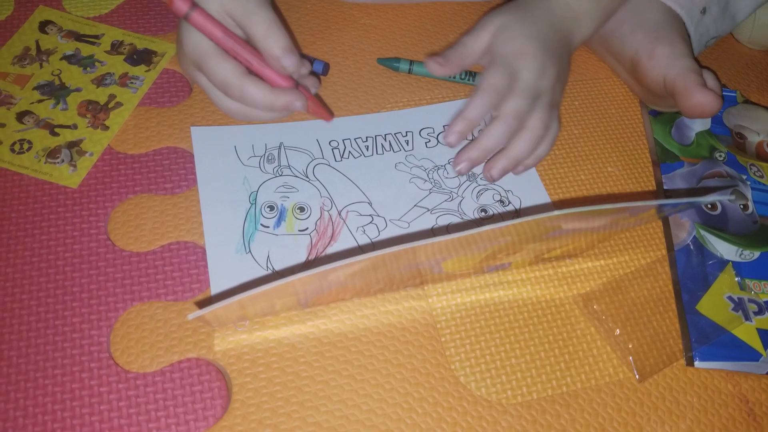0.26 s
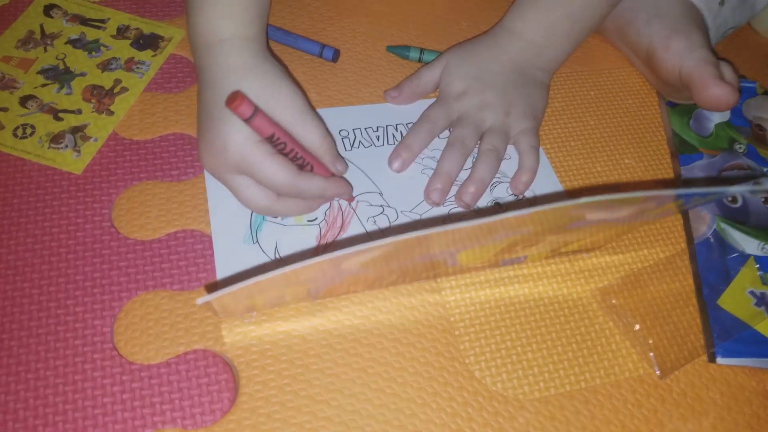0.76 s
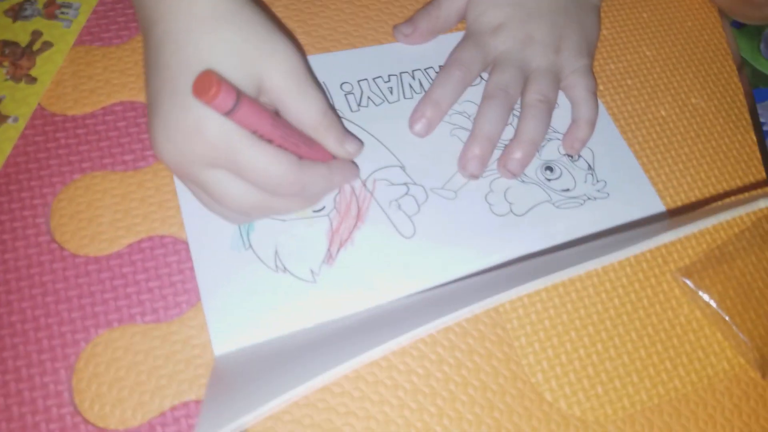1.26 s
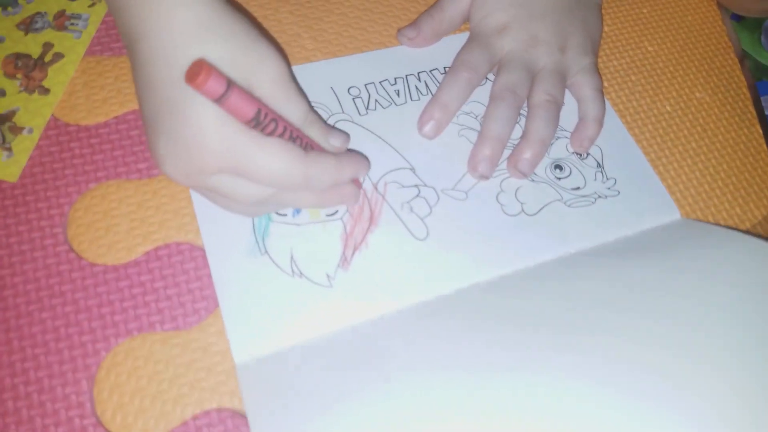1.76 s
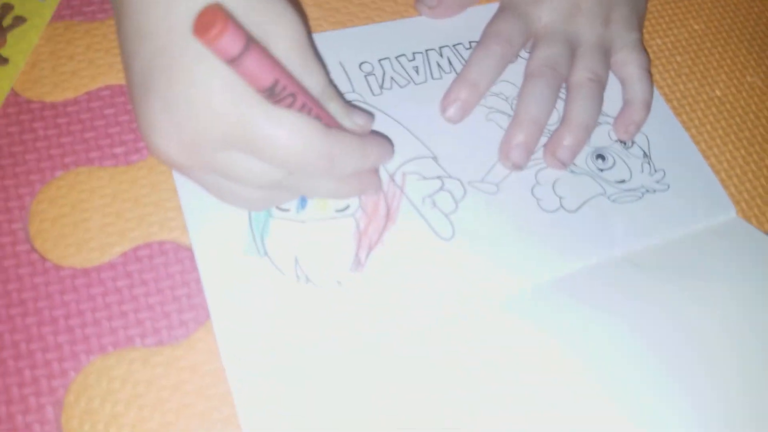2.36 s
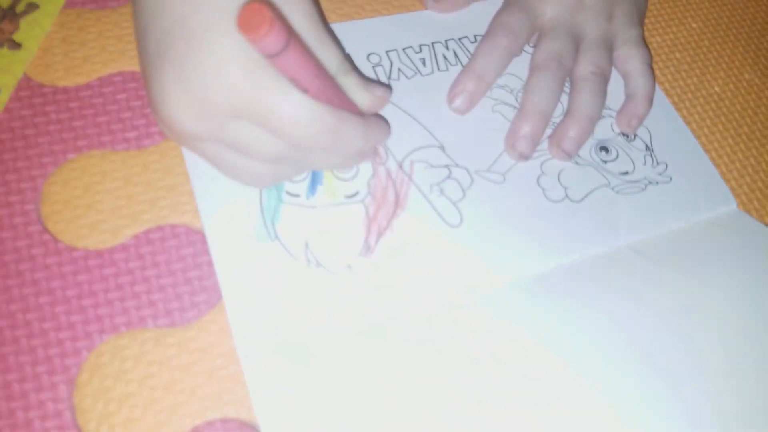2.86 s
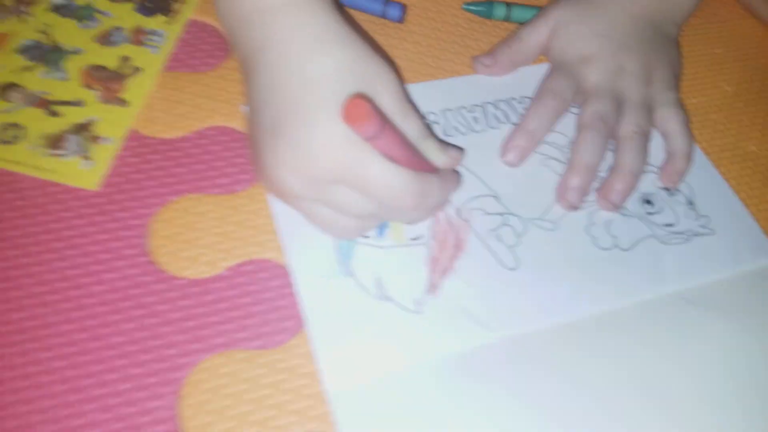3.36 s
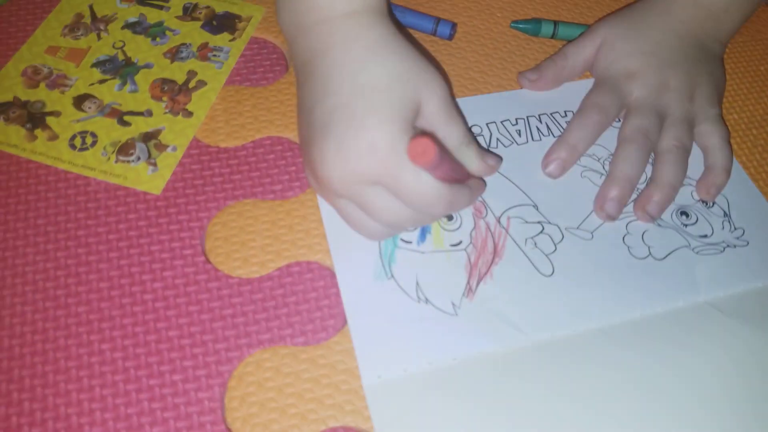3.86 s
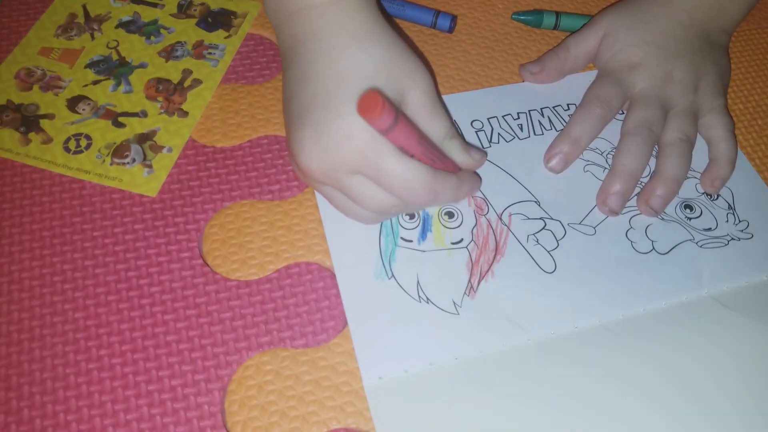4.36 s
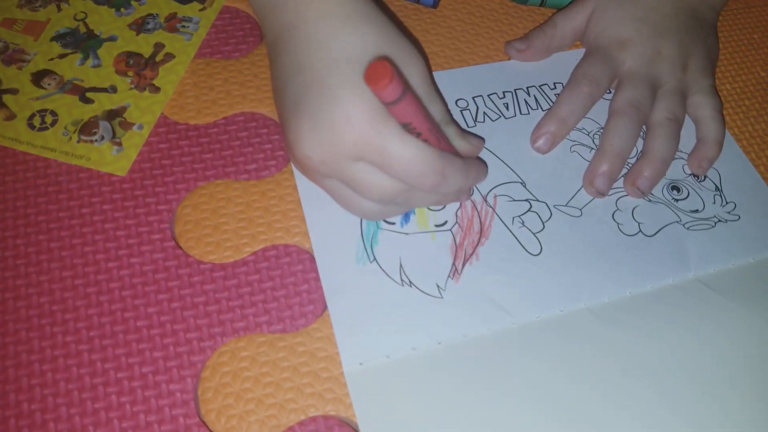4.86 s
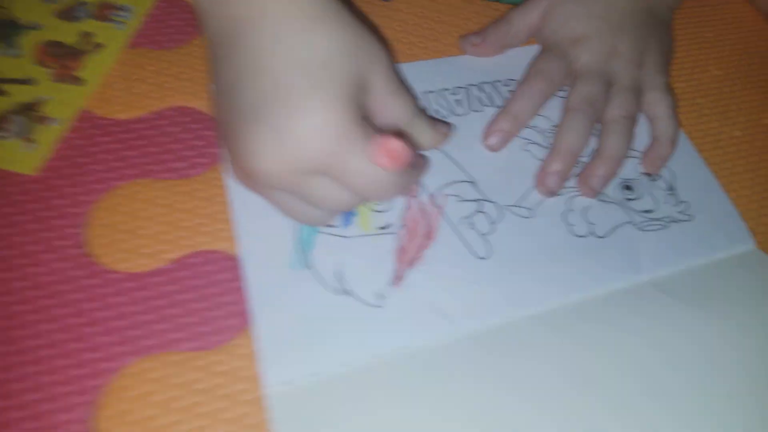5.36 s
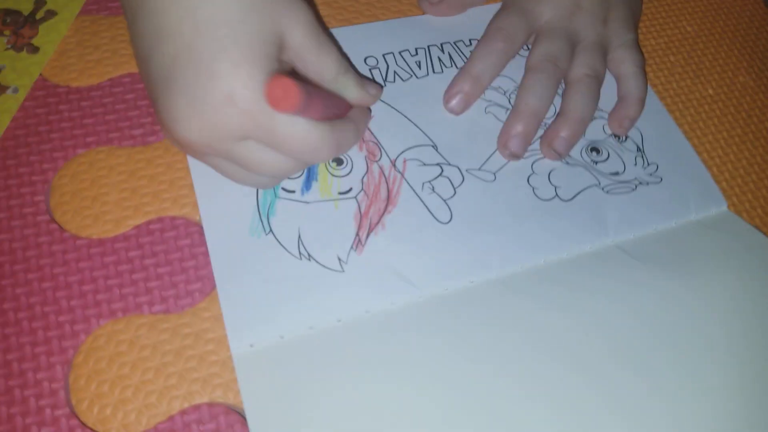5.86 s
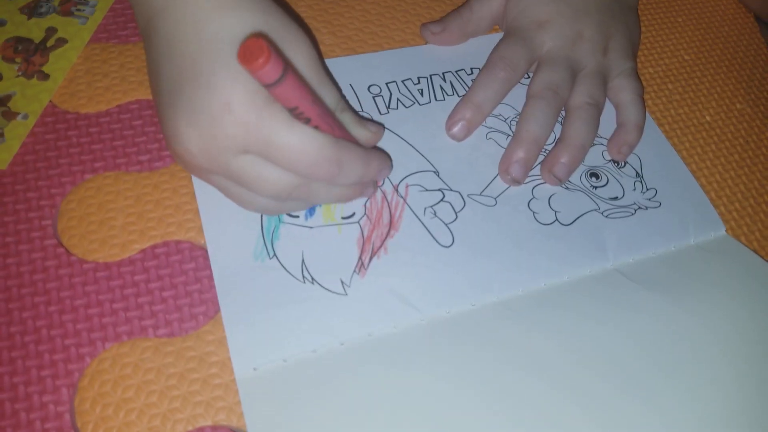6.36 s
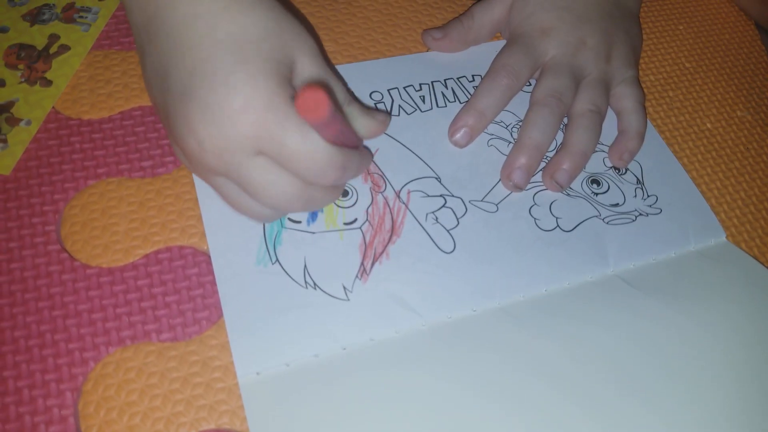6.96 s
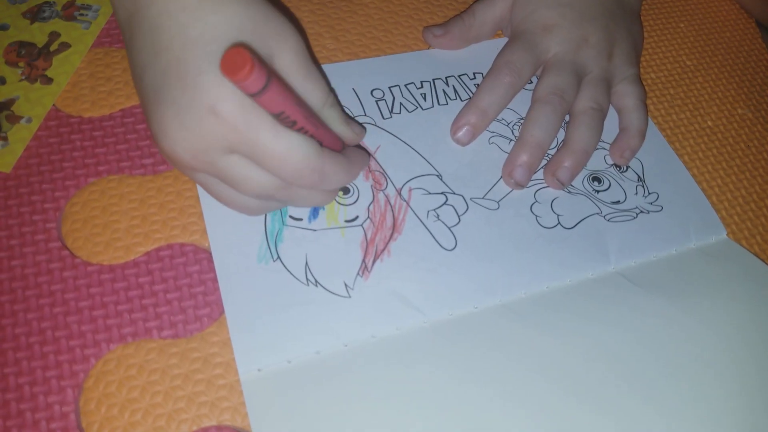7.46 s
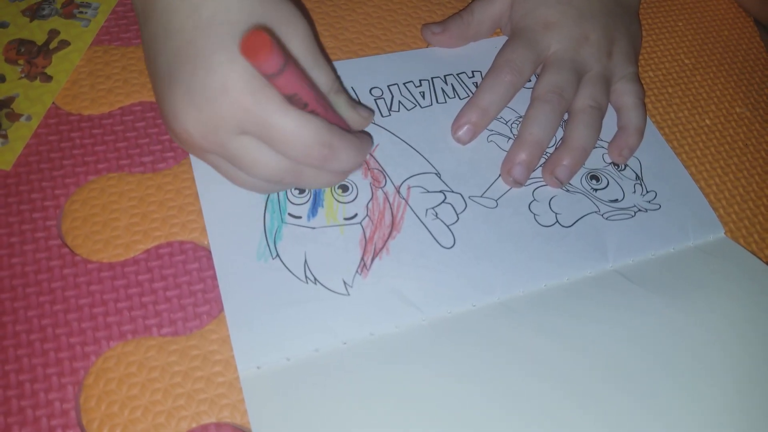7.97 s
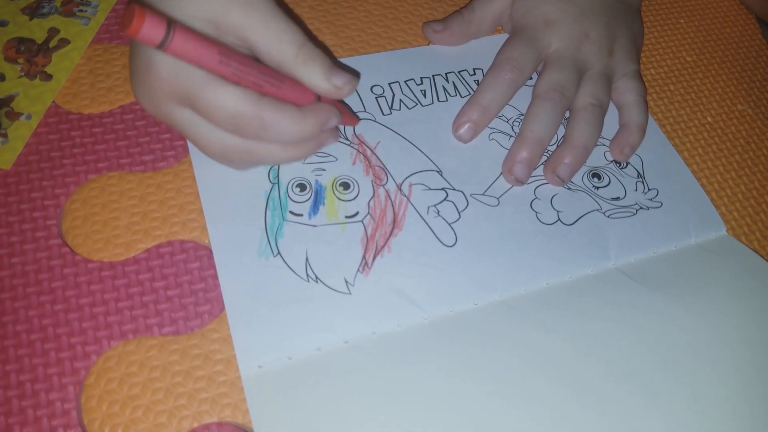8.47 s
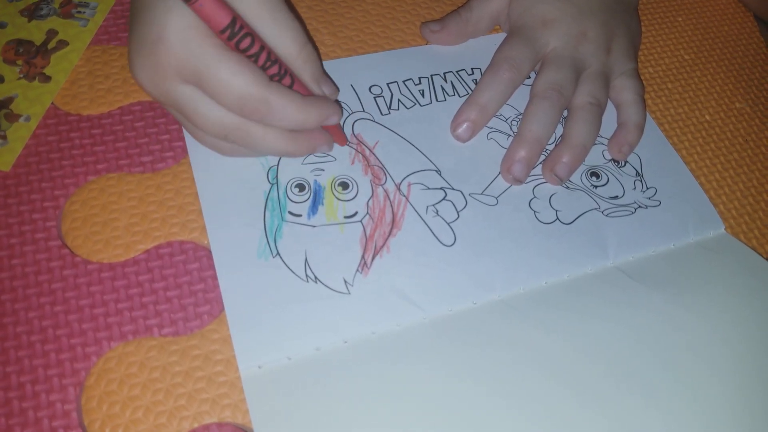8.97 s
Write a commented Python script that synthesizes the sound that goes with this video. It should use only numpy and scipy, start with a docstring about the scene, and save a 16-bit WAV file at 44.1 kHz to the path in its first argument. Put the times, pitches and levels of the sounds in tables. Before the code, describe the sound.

Close, sharp clicks, thuds and skin rubs come from fingers shifting on the microphone, mainly on the right, along with soft slides of paper and a couple of crayon strokes. As the handling settles, a wax crayon scribbles quietly on a colouring book in short scratches. The fingers bump once more midway, and the last strokes grow longer and gentler. A fan's low drone and faint airy hiss fill the quiet room throughout.

```python
"""A fan motor hums in a quiet room, where a child colours a book with a wax crayon on a foam mat.
First come two lone strokes, wax catching on paper, while the page slides as the book is opened flat.
Fingers rub and tap the phone held above it, beside the right microphone, far louder than the crayon
and loudest near 2.5 s. From 3.5 s the crayon scratches in short strokes. Between 5 and 6 s the fingers
shift again and the page slides once more; the last strokes are longer and softer."""
import sys
import numpy as np
from scipy import signal
from scipy.fft import rfft, irfft
from scipy.io import wavfile
from scipy.ndimage import uniform_filter1d

SR = 44100
rng = np.random.default_rng(int(sys.argv[2]) if len(sys.argv) > 2 else 0)


def wrap_up_sound(samples):
    """Save the sound to the file named by the first command line argument, as 16-bit audio."""
    columns = np.atleast_2d(samples).T
    # keep every value between -1 and 1, then stretch to whole-number steps
    tamed = np.clip(columns, -1, 1)
    steps = np.round(tamed * 32767).astype(np.int16)
    wavfile.write(sys.argv[1], SR, steps)


N = 407032
TIME = np.arange(N) / SR
FREQ = np.maximum(np.fft.rfftfreq(N, 1 / SR), 1)

# crayon strokes: (start [s], end [s], pressure [dB])
STROKES = [(0.398, 0.504, 0.5), (1.262, 1.438, -7), (3.457, 3.696, -9.5), (3.682, 3.844, -2),
           (3.898, 4.028, -5), (4.107, 4.204, -2), (4.342, 4.547, 1), (4.662, 4.874, 2.5),
           (5.031, 5.172, -2), (5.224, 5.322, 0), (5.398, 5.51, -3), (5.76, 5.835, 0.5), (5.804, 5.934, -2),
           (6.059, 6.15, -1.5), (6.637, 6.793, -2.5), (6.985, 7.094, -2.5), (7.108, 7.183, -11),
           (7.598, 7.749, -2.5), (7.883, 7.946, -4.5), (7.932, 8.094, -6.5), (8.33, 8.648, -6.5),
           (8.614, 8.793, -10.5), (8.948, 9.3, -10.5)]
# tone of wax dragging over paper: (frequency [Hz], left [dB], right [dB])
WAX_TONE = [(1160, -108, -101), (1850, -102, -87.5), (2500, -107, -108), (3320, -104, -91),
            (3630, -108, -99), (4900, -106, -91.5), (5930, -120, -96), (7300, -120, -91.5),
            (8130, -118, -102.5), (9150, -118, -98.5), (10500, -121, -100.5), (12400, -119, -116),
            (14400, -116, -116), (15500, -113, -108)]
# slides of the page: (fastest moment [s], rise [s], fall [s], relative level [dB])
PAGE_SLIDES = [(.433, 0.011, 0.031, -2.5), (.815, 0.038, .06, -9), (1.03, 0.071, 0.096, -5),
               (1.615, 0.065, 0.024, -7.5), (2.08, 0.082, 0.063, 1), (2.45, 0.16, .035, -10.5),
               (5.81, 0.02, 0.058, -10)]
# tone of sliding paper: (frequency [Hz], left [dB], right [dB])
PAGE_TONE = [(300, -99, -86), (700, -89.5, -100), (1420, -87, -90.5), (2030, -87.5, -80.5),
             (2900, -85.5, -86), (4960, -91, -91), (5900, -105, -96), (9000, -108, -102),
             (12000, -109, -100), (15500, -104, -105)]
# finger taps on the phone's case: (time [s], thud [dB], thud pitch [Hz], click [dB], click pitch [Hz],
# sharp tick [dB], gain of the case's ring at the left microphone [dB])
FINGER_TAPS = [(0.4274, -32.5, 812, -24.5, 2250, -37, 1), (0.4411, -36, 143, -30.5, 3660, -40, 0),
               (0.941, -31, 469, -40, 3370, -55, -9), (0.9717, -21, 450, -28, 1870, -50, -20),
               (0.9807, -28, 350, -22.5, 3270, -14.5, -14), (1.5766, -32, 860, -34, 2700, -45, 4),
               (1.6182, -23, 437, -31, 3400, -34, 3), (1.659, -30, 494, -28.5, 1640, -34, 0.5),
               (1.7205, -25, 508, -26.5, 1800, -24.5, -8), (2.014, -52, 520, -28.5, 1600, -45, 6.5),
               (2.283, -26, 209, -32, 1940, -41.5, -9), (2.3657, -18, 790, -14, 4520, -20, 4),
               (2.3667, -30, 690, -4, 2730, -2, -7), (2.4426, -50, 400, -28.5, 1990, -48, -4),
               (2.5238, -8.5, 670, 0.5, 2060, -39, -7), (2.533, -1, 396, -6.5, 3030, -26, 0),
               (2.5392, -14, 506, -13.5, 1700, -12.5, -27), (2.558, -24, 487, -25, 2440, -39, 1),
               (2.7194, -35, 400, -48, 3000, -34, -10), (2.966, -21, 387, -28.5, 2070, -44, -14),
               (3.0948, -13.5, 224, -31, 560, -33, -4), (3.2137, -42, 400, -22, 3500, -30, 8),
               (3.2225, -44, 400, -12, 2750, -15, -4), (3.2271, -19, 370, -15.5, 2370, -20, 1),
               (3.256, -54, 655, -28, 710, -50, -7), (3.531, -24, 61.3, -29, 2380, -62, 3),
               (4.1636, -21.5, 107, -43, 785, -58, -9), (5.2842, -21.5, 229, -22, 1150, -46, -15),
               (5.3515, -20.5, 403, -19.5, 2800, -15.5, -12), (5.5506, -6.5, 390, -18, 1720, -23, -9),
               (5.5827, -19.5, 290, -19.5, 1610, -21, -16), (5.633, -28, 130, -44, 1690, -58, 1),
               (5.698, -26.5, 493, -35.5, 1280, -51, -4), (6.918, -55.5, 705, -41.5, 1640, -60, 0)]
# notes of the case, rung by every tap: (pitch [Hz], sharpness [Q], gain [dB])
CASE_NOTES = [(458, 2.7, -4.5), (1160, 3, -5), (2340, 6, -7), (3150, 10.3, -8.5), (4820, 9.2, -8),
              (15000, 1.9, -0.5)]
# finger rubs on the case: (start [s], length [s], relative drag [dB], relative hiss [dB])
FINGER_RUBS = [(.45, 0.28, -16.5, -16), (0.767, 0.077, -13, 0.5), (.96, .215, -13, -4.5),
               (1.267, 0.14, -25, -5), (1.57, 0.13, -6, 4), (1.88, 0.28, -12, -5.5),
               (2.336, 0.16, -3.5, -3), (2.511, 0.063, 13.5, 13), (2.572, 0.13, 0.5, 5),
               (2.916, 0.21, -2, 2), (3.192, 0.033, 9.5, 10), (3.253, 0.065, -14, -13),
               (5.218, 0.57, -15.5, -22), (5.535, 0.048, -5, 0), (5.656, .08, -15, -30)]
# tone of skin dragging on the case: (frequency [Hz], left [dB], right [dB])
SKIN_TONE = [(40, -88, -75), (100, -84, -67.5), (206, -79, -75.5), (450, -85.5, -75.5), (890, -89, -79.5),
             (1600, -101, -82), (3300, -93, -81), (4620, -98, -87), (6650, -107, -89), (9030, -112, -96),
             (14000, -125, -108)]
# tone of the fine hiss of a light touch: (frequency [Hz], left [dB], right [dB])
TOUCH_TONE = [(5000, -135, -125), (9070, -118, -101), (12600, -111, -93.5), (15200, -104, -99.5)]
# steady notes of the motor: (pitch [Hz], left [dB], right [dB], pitch wander [Hz])
HUM_NOTES = [(118.5, -60, -58.5, 0.53), (191, -82, -82, 0.7), (226.7, -70.5, -69, 2.32),
             (239.2, -69, -70, 0.83), (359, -64, -64.5, 0.37)]
# thin motor whine at the right microphone: (time [s], level [dB])
WHINE_LEVEL = [(0, -61.5), (.7, -62.5), (1.5, -66), (2.5, -71), (9.2, -74)]
# tone of the room's low drone: (frequency [Hz], left [dB], right [dB])
DRONE_TONE = [(24.9, -100, -79), (38.8, -102, -96), (45.7, -88, -73), (53.7, -86.5, -86), (101, -91.5, -80),
              (152, -90, -84.5), (215, -81.5, -83.5), (281, -90.5, -90), (293, -92, -88.5),
              (345, -83.5, -83), (467, -91.5, -93.5), (540, -95.5, -99.5), (610, -108, -108),
              (1200, -135, -135)]
# the upper drone grows as the phone leaves a quiet spot of the room: (time [s], gain [dB])
UPPER_DRONE_GAIN = [(0, -3.5), (.7, -6.5), (1.3, 0.5), (5.5, 1), (7.5, 1.5), (9.2, 0)]
# tone of the fan's rushing air, with the phone held high and held low:
# (frequency [Hz], high left [dB], high right [dB], low left [dB], low right [dB])
AIR_TONE = [(644, -101, -96.5, -105, -102), (710, -95, -90.5, -99, -101), (1010, -106, -95, -108, -94),
            (1430, -102, -100, -97.5, -103), (1760, -103, -93, -98.5, -97.5),
            (2050, -99.5, -99, -106, -102), (2470, -103, -99, -111, -112), (2850, -102, -99, -99, -100),
            (3670, -110, -101, -110, -103), (4300, -112, -100, -114, -105), (6300, -118, -104, -119, -108),
            (7800, -119, -111, -120, -117), (12000, -116, -112, -117, -118),
            (15600, -112, -114, -118, -120)]
# how far the phone has been lowered: (time [s], share [0-1])
PHONE_LOWERED = [(0, 0), (.8, 0), (1.5, 0.33), (3.5, 0.56), (5.4, 0.78), (5.9, 0.7)]


def crayon(late_peak=1.16, roundness=0.9, chatter_db=1.5):
    """Wax catches on the paper's grain; each stroke speeds up, then slows more quickly to the turn."""
    strength = np.zeros(N)
    for start, end, pressure_db in STROKES:
        progress = np.clip((TIME - start) / (end - start), 0, 1)
        speed = np.abs(np.sin(np.pi * progress ** late_peak)) ** roundness
        strength += undb(pressure_db) * speed
    scratch = colour(friction(slips_per_s=7300, spread_db=1.5), WAX_TONE)
    return scratch * strength * undb(chatter_db * wobble(70))


def page(level_db=-1, catch_db=2):
    """Paper slides over paper: it speeds up, catches lightly as it goes, and friction brakes it."""
    power = 0
    for fastest, rise, fall, db in PAGE_SLIDES:
        from_peak = np.maximum((fastest - TIME) / rise, (TIME - fastest) / fall)
        power += (undb(db) / np.cosh(np.minimum(from_peak, 20))) ** 2
    rustle = colour(friction(slips_per_s=1500, spread_db=2), PAGE_TONE)
    return rustle * np.sqrt(power) * undb(level_db + catch_db * wobble(59.4))


def finger_taps(tap_q=1.034, case_lag_s=0.00019, echo_s=0.21, size=16384):
    """A fingertip thuds on the right microphone, the case clicks and rings, and the phone sways."""
    t = np.arange(size) / SR
    freq = np.maximum(np.fft.rfftfreq(size, 1 / SR), 1)

    def ring(hz, q):
        """A fading note; the lower q is, the sooner it dies."""
        return np.exp(-np.pi * hz * t / q) * np.sin(2 * np.pi * hz * t)

    def snap(hz, q):
        """A short click around one pitch, with a peak of 1."""
        wave = irfft(resonance(freq, hz, q) ** 3)
        return wave / abs(wave).max()

    case = sum(undb(db) * resonance(freq, hz, q) for hz, q, db in CASE_NOTES)
    case *= np.exp(-2j * np.pi * freq * case_lag_s)
    tick = snap(hz=13500, q=0.58)
    sway = undb(-29) * ring(hz=62, q=3.8)
    out = np.zeros((2, N + size))
    for when, thud_db, thud_hz, click_db, click_hz, tick_db, left_db in FINGER_TAPS:
        # the fingertip stops thud and click within a swing or two
        thud = undb(thud_db) * (ring(thud_hz, tap_q) + sway)
        click = undb(click_db) * snap(click_hz, tap_q / 1.19)
        tap = thud + click + undb(tick_db) * tick
        case_ring = irfft(rfft(tap) * case)
        # the left microphone hears the tap through the case
        mics = np.array([undb(left_db) * case_ring, tap + undb(-8) * case_ring]) * (t < t[-1] / 2)
        # a little of the case's ring comes back from the walls
        walls = undb(-52) * rng.standard_normal((2, size)) * np.exp(-np.log(1000) * t / echo_s)
        echo = signal.fftconvolve(walls, mics[:1], axes=1)[:, :size]
        start = int(when * SR)
        out[:, start:start + size] += mics + echo
    return out[:, :N]


def finger_rubs(grab_s=0.019, swell_share=0.18, catch_db=1.5):
    """Skin sticks and slips on the case: pressing makes it drag, a light touch makes a fine hiss."""
    # restless fingers creep faintly between the early rubs; the two rows are drag and hiss
    creep = hold(start=0.61, length=2.29, rise_s=0.13, fall_s=0.13)
    power = (undb([[-19.5], [-24]]) * creep) ** 2
    for start, length, drag_db, hiss_db in FINGER_RUBS:
        rub = hold(start, length, rise_s=grab_s + swell_share * length, fall_s=0.019)
        power += (undb([[drag_db], [hiss_db]]) * rub) ** 2
    pressed, brushed = np.sqrt(power)
    drag = colour(friction(slips_per_s=2200, spread_db=1.5), SKIN_TONE) * pressed * undb(-4)
    hiss = colour(friction(slips_per_s=2640, spread_db=4), TOUCH_TONE) * brushed * undb(-2)
    return (drag + hiss) * undb(catch_db * wobble(110))


def hand_echo(sound, delay_s=0.000639, strength=0.17, dull_hz=9000):
    """The hand cupped round the phone throws near sounds back, which makes them a little hollow."""
    bounce = strength * np.exp(-2j * np.pi * FREQ * delay_s) / np.hypot(1, FREQ / dull_hz)
    return irfft(rfft(sound) * (1 + bounce), N) / np.hypot(1, strength)


def motor(waver_db=1.5, whine_hz=1092, whine_left_db=-11):
    """The fan's motor hums with the mains power and gives a thin whine that grows fainter."""
    def note(hz, wander_hz):
        """One tone that wavers a little in pitch and loudness."""
        phase = 2 * np.pi * np.cumsum(hz + wander_hz * wobble(6)) / SR
        return np.sqrt(2) * np.sin(phase) * undb(waver_db * wobble(5.5))

    hum = sum(undb([[left], [right]]) * note(hz, wander) for hz, left, right, wander in HUM_NOTES)
    whine = undb(curve(WHINE_LEVEL)) * note(whine_hz, wander_hz=1.2)
    return hum + undb([[whine_left_db], [0]]) * whine


def room_drone(upper_band_hz=(290, 580)):
    """The fan fills the room with a low drone and hum, whose upper part changes as the phone moves."""
    drone = colour(fan_noise(wall_share=0.081), DRONE_TONE) + from_right(motor())
    upper = signal.sosfiltfilt(signal.butter(3, upper_band_hz, "band", fs=SR, output="sos"), drone)
    return drone + upper * (undb(curve(UPPER_DRONE_GAIN)) - 1)


def fan_air(low_cut_hz=520, flutter_db=1.5):
    """Air rushes from the fan with a slight flutter; its tone changes as the phone is lowered."""
    noise = np.vstack([fan_noise(wall_share=0.77), fan_noise(wall_share=0.84)])
    rush = signal.sosfilt(signal.butter(4, low_cut_hz, "high", fs=SR, output="sos"), noise)
    held_high, held_low = colour(rush, AIR_TONE).reshape(2, 2, N)
    lowered = curve(PHONE_LOWERED)
    air = np.sqrt(1 - lowered) * held_high + np.sqrt(lowered) * held_low
    return air * undb(flutter_db * wobble(7.5))


def fan_noise(wall_share):
    """Plain hiss at both microphones: part comes straight from the right, part bounces off the walls."""
    direct = rng.standard_normal(N)
    bounced = rng.standard_normal((2, N))
    return np.sqrt(1 - wall_share) * from_right([direct, direct]) + np.sqrt(wall_share) * bounced


def from_right(pair, lag_samples=20):
    """Sound from the right reaches the left microphone later."""
    return np.array([np.roll(pair[0], lag_samples), pair[1]])


def friction(slips_per_s, spread_db, hiss_share=0.8):
    """Rubbing surfaces make tiny slips of uneven size over a smooth hiss."""
    sizes = undb(spread_db * np.minimum(rng.exponential(size=N), 4))
    slips = (rng.random(N) < slips_per_s / SR) * rng.choice([-1, 1], N) * sizes
    hiss = rng.standard_normal((2, N))
    return np.sqrt(1 - hiss_share) * slips / slips.std() + np.sqrt(hiss_share) * hiss


def colour(noise, table):
    """Gives plain noise the tone in a table, with one output for each dB column."""
    hz, *columns = np.transpose(table)
    gains = undb([np.interp(np.log(FREQ), np.log(hz), db) for db in columns])
    return irfft(rfft(noise) * gains, N) * np.sqrt(SR / 2)


def resonance(freq, hz, q):
    """How a ringing object answers each frequency: most strongly at its own pitch, hz."""
    return 1 / (1 + 1j * q * (freq / hz - hz / freq))


def wobble(rate):
    """A smooth random drift of about 1 either way, changing rate times a second."""
    span = int(SR / rate)
    steps = np.repeat(rng.standard_normal(N // span + 2), span)
    offset = rng.integers(span)
    return uniform_filter1d(steps[offset:offset + N], span) * np.sqrt(3 / 2)


def hold(start, length, rise_s, fall_s):
    """A level that rises from the start, holds to the end of its length, then dies away."""
    since = TIME - start
    return np.clip(since / rise_s, 0, 1) * np.exp(-np.clip((since - length) / fall_s, 0, 20))


def curve(table):
    """Joins the (time, value) points of a table with straight lines."""
    return np.interp(TIME, *np.transpose(table))


def undb(db):
    """Turns decibels into a number to multiply by."""
    return 10 ** (np.asarray(db) / 20)


def scene():
    """Crayon and page, fingers on the phone, and the fan behind them."""
    return crayon() + hand_echo(page() + finger_rubs()) + finger_taps() + room_drone() + fan_air()


def record(dry):
    """The phone cuts the deepest bass and the highest treble."""
    bass_hz, treble_hz = 42, 15900
    trimmed = signal.sosfilt(signal.butter(3, bass_hz, "high", fs=SR, output="sos"), dry)
    treble_cut = 1 / (1 + (FREQ / treble_hz) ** 120)
    return irfft(rfft(trimmed) * treble_cut, N)


dry = scene()
out = record(dry)
wrap_up_sound(out)
```